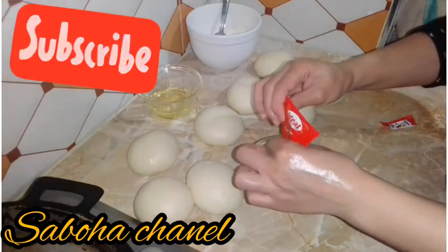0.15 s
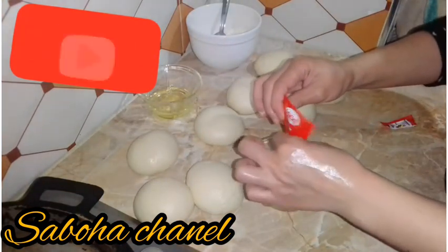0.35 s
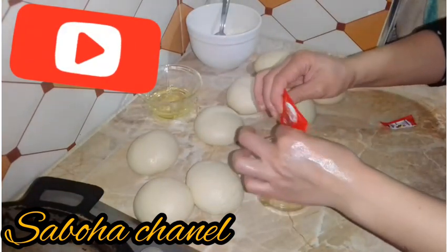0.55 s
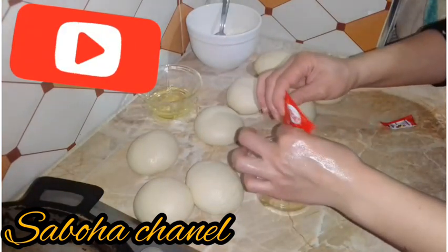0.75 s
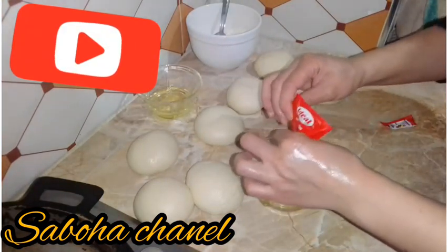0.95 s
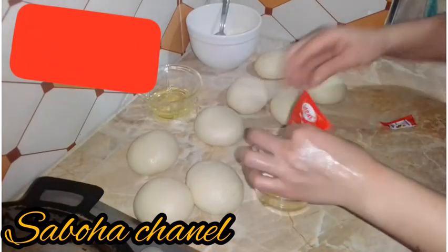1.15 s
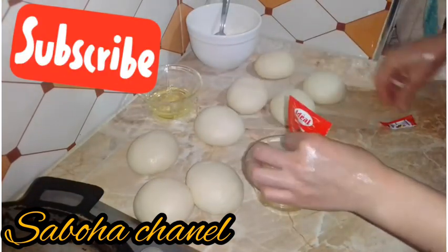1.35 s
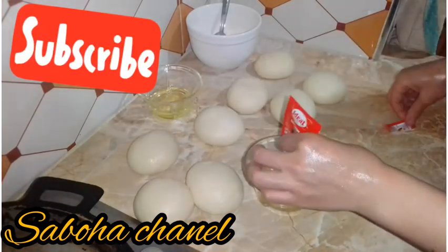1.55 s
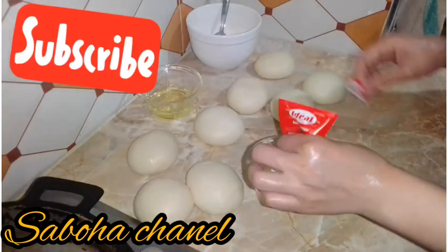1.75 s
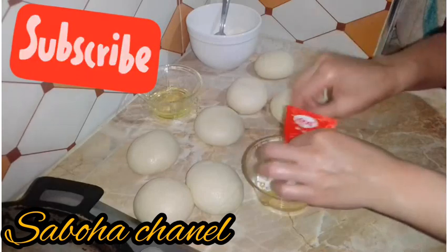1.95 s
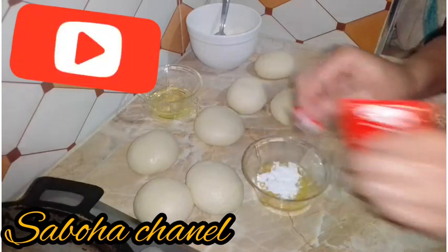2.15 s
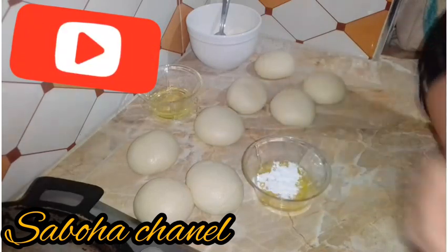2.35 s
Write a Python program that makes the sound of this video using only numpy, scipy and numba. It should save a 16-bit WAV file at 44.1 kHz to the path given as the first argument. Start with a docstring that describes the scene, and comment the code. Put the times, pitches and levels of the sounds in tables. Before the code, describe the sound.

A small stiff paper sachet crinkles and tears close by in a quiet tiled kitchen.

```python
"""Paper sachet torn in a kitchen

A small paper sachet is torn, squeezed and shaken close to a phone in a tiled kitchen.
Dense fibre clicks ring the stiff sheet in short strokes and single creases snap at their own pitch.
A faint low tone sinks as the tear begins, and filtered bursts make the rumble of hands on the worktop.
Decaying noise gives the small room its short tail; coloured noise is the quiet hum behind."""
import sys
import numpy as np
from scipy import signal
from scipy.fft import rfft, irfft
from scipy.io import wavfile
from scipy.ndimage import uniform_filter1d
from numba import njit

SR = 44100
rng = np.random.default_rng(int(sys.argv[2]) if len(sys.argv) > 2 else 0)


def wrap_up_sound(samples):
    """Save the sound to the file named by the first command line argument, as 16-bit audio."""
    columns = np.atleast_2d(samples).T
    # keep every value between -1 and 1, then stretch to whole-number steps
    tamed = np.clip(columns, -1, 1)
    steps = np.round(tamed * 32767).astype(np.int16)
    wavfile.write(sys.argv[1], SR, steps)


def field_ratio(decibels):
    """Amplitude ratio for a level in dB (20 dB per decade); scalars and array-likes work."""
    return 10 ** (np.asarray(decibels, dtype=float) / 20)


N = 105840

# Broad colour of paper clicks. Each row: frequency in Hz, relative level in dB per Hz.
PAPER = [(600, -8), (800, -5), (1100, -5.5), (1450, -10.5), (2000, -9.5), (2800, -7), (4000, -3.5),
         (5100, -11.5), (5900, -23.5), (8000, -24), (10000, -23), (12000, -15.5), (14200, -7.5),
         (16000, -10)]


def unit(x):
    """Scales a sound to an rms of 1."""
    return x / np.sqrt(np.mean(x ** 2))


def colour(x, points):
    """Causal minimum-phase filter through (Hz, dB) points, built from the folded cepstrum."""
    points = np.array(points, float)
    freqs = np.fft.rfftfreq(4096, 1 / SR)
    level_db = np.interp(np.log(freqs + 1), np.log(points[:, 0]), points[:, 1])
    cepstrum = irfft(level_db * np.log(10) / 20)
    cepstrum[1:2048] *= 2
    cepstrum[2049:] = 0
    response = irfft(np.exp(rfft(cepstrum)))[:2048]
    return signal.fftconvolve(x, response)[:N]


def band(x, lo_hz, hi_hz):
    """Keeps the range between two frequencies."""
    edges = [lo_hz, min(hi_hz, 0.45 * SR)]
    return signal.sosfilt(signal.butter(4, edges, "band", fs=SR, output="sos"), x)


def ring(x, hz, width_hz):
    """One fixed resonance, gain 1 at its centre."""
    return signal.lfilter(*signal.iirpeak(hz, hz / width_hz, SR), x)


@njit
def moving_ring(x, hz, width_hz):
    """One resonance whose centre moves, as a state-variable filter; gain 1 at the centre."""
    y, band_state, low_state = np.empty(len(x)), 0., 0.
    for i in range(len(x)):
        g = np.tan(np.pi * hz[i] / SR)
        k = width_hz / hz[i]
        v = (band_state + g * (x[i] - low_state)) / (1 + g * (g + k))
        band_state = 2 * v - band_state
        low_state = low_state + 2 * g * v
        y[i] = k * v
    return y


def walk(rate):
    """Random levels held for 1 / rate seconds and slewed twice."""
    hold = int(SR / rate)
    levels = np.repeat(rng.standard_normal(N // hold + 1), hold)
    slewed = uniform_filter1d(uniform_filter1d(levels, hold), hold)
    return 2.04 * slewed[:N]


def curve(rows, index):
    """One column of a table, drawn over time; the first column is seconds."""
    rows = np.array(rows, float)
    return np.interp(np.arange(N) / SR, rows[:, 0], rows[:, index])


def effort():
    """Gains of the finger strokes, summed in power: sheet, lower body and fine treble."""
    # Strokes on the paper. Each row: start in seconds, swell in seconds, time to fall 20 dB in seconds
    # (never under 0.015), level in dB, lower body in dB and fine treble in dB relative to that level.
    strokes = [(0, 0.0015, -0.27, -59, -4, -3), (0.178, 0.026, 0.06, -52, -6, -4),
               (0.221, 0.026, 0.06, -45.5, -8.5, -7), (0.299, 0.0041, -0.04, -40.5, -25, -10),
               (0.365, 0.0047, 0.09, -47, -16, -2), (0.422, 0.003, 0.54, -53.5, -40, -9),
               (0.463, 0.044, -0.01, -38, -12, -12), (0.51, 0.033, 0.03, -44.5, -1, -7.5),
               (0.618, 0.031, 0.07, -36, -11, -12), (0.725, 0.034, 0.1256, -35.5, -8, -12.5),
               (0.86, 0.036, 0.0547, -34, -11, -12), (0.955, 0.026, 0.0431, -42, -7.5, -17),
               (0.993, 0.03, 0.0682, -37.5, -7, -12.5), (1.146, 0.037, 0.0558, -43.5, -10.5, -5.5),
               (1.252, 0.03, 0.15, -48.5, -8, -6), (1.331, 0.034, -0.04, -52, -0.5, -9),
               (1.43, 0.031, 0.05, -55, -6, -2), (1.554, 0.0029, 0.0044, -65.5, -6, -25),
               (1.593, 0.0012, 0.16, -69.5, -30, -4), (1.721, 0.06, 0.06, -50, -9, -3),
               (1.796, 0.0041, 0.08, -46, -6, -1), (1.921, 0.019, 0.0626, -48.5, -7.5, -2),
               (1.951, 0.009, 0.0727, -48.5, -34, -5), (2.041, 0.037, 0.03, -53, -8.5, -1),
               (2.088, 0.026, 0.0633, -50, -5.5, -4.5), (2.225, 0.04, 0.02, -61.5, -7, -2)]
    start_db, grip_s, fall_curve = -11, 0.0031, 1.2  # grips under its top, swells, falls ever faster
    power = np.full((3, N), 1e-18)
    for start_s, swell_s, fall_s, db, low_db, fine_db in strokes:
        i = int(start_s * SR)
        fall_s = max(fall_s, 0.015)
        t = np.arange(min(N - i, int((swell_s + 4 * fall_s) * SR))) / SR
        rise_db = start_db * (1 - t / swell_s).clip(0, 1)
        drop_db = 20 * ((t - swell_s) / fall_s).clip(0) ** fall_curve
        gain = field_ratio(db + rise_db - drop_db) * (t / grip_s).clip(0, 1)
        power[:, i:i + len(t)] += np.outer(field_ratio([0, low_db, fine_db]), gain) ** 2
    return np.sqrt(power)


def fibres(clicks_per_s, scatter_db, click_s):
    """Short bursts of breaking fibres, scattered in size, over a rubbing hiss."""
    rub_db = -2.5
    breaks = rng.random(N) < clicks_per_s / SR
    sizes = field_ratio(scatter_db * rng.exponential(1, N).clip(0, 3))
    burst_noise, rub_noise = rng.standard_normal((2, N))
    envelope = signal.lfilter([1], [1, -np.exp(-1 / (click_s * SR))], breaks * sizes)
    return unit(unit(envelope * burst_noise) + field_ratio(rub_db) * rub_noise)


def crinkle(body, low, fine):
    """Bursts of many colours ring the sheet; its modes shift, come and go as the paper bends."""
    # Modes of the sheet. Each row: centre in Hz, width in Hz, relative level in dB while it is torn,
    # relative level in dB once it hangs open.
    modes = [(1018, 74, -4, -44), (1232, 39, -11.5, -9.5), (1613, 147, -13.5, -4), (1775, 36, -11.5, -18),
             (2087, 50, -8, -11.5), (2463, 25, -8.5, -6.5), (2820, 69, 1.5, -1.5), (3126, 61, -18, 2.5),
             (3480, 69, -0.5, -3.5), (3712, 98, 1, -8), (4047, 80, -2, -2), (4522, 74, -2, 2.5),
             (4910, 160, 0.5, -2), (5100, 105, -2.5, -5), (5520, 274, -9.5, 0)]
    # Edges in Hz of the ranges in which fibres snap.
    patch_hz = (650, 1300, 2300, 3300, 4400, 7000, 10500, 16500)
    # The sheet's upper range as the tear moves on. Each row: time in seconds, relative level in dB.
    upper = [(0, -5.5), (.22, -2), (.56, -6.5), (.66, 0), (.9, -3.5), (1.2, -1.5), (1.6, -4.5), (1.8, -1),
             (2.4, -2.5)]
    opens_s = (1.1, 1.95)  # the sheet changes shape between these times
    modes_db, mode_walk_db, mode_walk_per_s = 8, 2, 22
    bend, bend_per_s = 0.0065, 15  # scale of the shift of each mode, as a share of its pitch

    def burst():
        return fibres(clicks_per_s=900, scatter_db=4, click_s=0.00048)

    wide = burst()  # spans all ranges, beside a separate burst in each
    patches = [band(wide + burst(), lo, hi) for lo, hi in zip(patch_hz, patch_hz[1:])]

    opened = np.interp(np.arange(N) / SR, opens_s, (0, 1))
    moving_modes = []
    for hz, width_hz, torn_db, open_db in modes:
        level_db = modes_db + torn_db + (open_db - torn_db) * opened
        gain = field_ratio(level_db + mode_walk_db * walk(mode_walk_per_s))
        centre_hz = hz * (1 + bend * walk(bend_per_s))
        moving_modes.append((centre_hz, float(width_hz), gain))

    def sheet(push):
        ringing = sum(moving_ring(push * gain, hz, width) for hz, width, gain in moving_modes)
        return colour(push, PAPER) + band(ringing, 820, 7150)

    # level of each part under a steady push, so that the strokes set the final level
    steady = sheet(sum(patches))
    low = low / np.std(band(steady, patch_hz[0], patch_hz[2]))
    body = body / np.std(band(steady, patch_hz[2], patch_hz[5]))
    fine = fine / np.std(band(steady, patch_hz[5], patch_hz[7]))
    gains = (low, low, body, body, body * field_ratio(curve(upper, index=1)), fine, fine)
    return sheet(sum(patch * gain for patch, gain in zip(patches, gains)))


def snaps():
    """A crease buckles: a tick, a short ring at its own pitch and a rustle of settling paper."""
    # Crease snaps. Each row: time in seconds, level in dB before the common trim, ring in Hz.
    creases = [(0.191, -38.5, 3580), (0.2359, -36, 3510), (0.3011, -26, 2820), (0.3671, -33.5, 2820),
               (0.4293, -32, 4120), (0.4639, -34.5, 3540), (0.4789, -26, 3490), (0.625, -34.5, 2820),
               (0.7313, -33.5, 4950), (0.844, -51, 4360), (0.8709, -24, 2092), (0.8895, -28, 4700),
               (0.9561, -28.5, 3630), (1.0184, -32.5, 4600), (1.1593, -38, 3540), (1.2736, -40, 2830),
               (1.3008, -30, 3880), (1.3656, -35, 4490), (1.4306, -44, 1610), (1.4573, -38.5, 2080),
               (1.5972, -43, 3480), (1.732, -46, 4380), (1.8022, -31.5, 4700), (1.934, -41, 2460),
               (2.055, -39.5, 4600), (2.112, -31.5, 3030)]
    trim_db, ring_s = -8.5, 0.0044
    tick_db, tick_s, tail_db, tail_s = -31, 0.00023, -11.5, 0.031
    rustles, rings = np.zeros(N), np.zeros(N)
    t = np.arange(3000) / SR
    rustle_shape = field_ratio(tick_db) * np.exp(-t / tick_s) + field_ratio(tail_db) * np.exp(-t / tail_s)
    for start_s, db, hz in creases:
        i = int(start_s * SR)
        gain = field_ratio(db + trim_db)
        ring_noise, rustle_noise = rng.standard_normal((2, len(t)))
        tone = np.sin(2 * np.pi * hz * t) + 0.87 * band(ring_noise, hz * 0.63, hz * 1.87)
        rings[i:i + len(t)] += gain * (tone * np.exp(-t / ring_s))[:N - i]
        rustles[i:i + len(t)] += gain * (rustle_noise * rustle_shape)[:N - i]
    paper_rms = np.std(colour(rng.standard_normal(N), PAPER))
    return rings + colour(rustles, PAPER) / paper_rms


def slide():
    """A faint, wavering low tone sinks as the tear begins: a sine with a gliding pitch."""
    # Low rubbing tone. Each row: time in seconds, pitch in Hz before wavering, rms level in dB likewise.
    glide = [(.18, 352, -60), (.255, 350, -57), (.39, 249.7, -59.5), (.5, 232.4, -68)]
    t = np.arange(N) / SR
    pitch_hz = curve(glide, index=1) * (1 + 0.016 * walk(24.6))
    tone = np.sqrt(2) * np.sin(2 * np.pi * np.cumsum(pitch_hz) / SR)
    sounding = (t > glide[0][0]) & (t < glide[-1][0])
    return tone * field_ratio(curve(glide, index=2) + 1.7 * walk(19.3)) * sounding


def hands(low):
    """Fingers and packet rumble through the worktop, all along and, lagging, with each stroke."""
    # Rumble of hands and packet. Each row: time in seconds, level in dB before wavering.
    rumble = [(0.0, -62.5), (0.14, -78.5), (0.2, -59), (0.57, -59), (1.05, -73), (1.12, -61), (1.38, -63),
              (1.53, -74.5), (1.7, -72), (2.1, -62.5), (2.4, -74)]
    # Colour of the worktop. Each row: frequency in Hz, relative level in dB per Hz.
    worktop = [(71, -80), (120, -33), (162, -60), (238, -5), (345, -1.5), (542, -1), (689, -9), (1000, -21),
               (1300, -17.5), (2200, -120)]
    # Resonances of the worktop. Each row: centre in Hz, width in Hz, relative level in dB.
    top_modes = [(366, 70, 3.5), (538, 45, -3)]
    bump_db, bump_s = -3.5, 0.01  # share of a stroke that reaches the worktop, and its lag
    follow = 1 / (bump_s * SR)
    bumps = signal.lfilter([follow], [1, follow - 1], low) * field_ratio(bump_db)
    gain = np.hypot(field_ratio(curve(rumble, index=1)), bumps) * field_ratio(1.7 * walk(29.35))
    knocks = colour(fibres(clicks_per_s=900, scatter_db=0.23, click_s=0.0023), worktop)
    resonances = sum(field_ratio(db) * ring(knocks, hz, width) for hz, width, db in top_modes)
    return unit(knocks + resonances) * gain


def room_tail(near):
    """The small room's short tail: noise decaying exponentially, convolved with the near sound."""
    tail_db, t60_s = -10, 0.069
    t = np.arange(SR // 2) / SR
    tail = rng.standard_normal(len(t)) * np.exp(-np.log(1000) * t / t60_s) * (t > 0.003)
    tail = tail / np.sqrt(np.sum(tail ** 2))
    return field_ratio(tail_db) * signal.fftconvolve(near, tail)[:N]


def hum():
    """Nearly steady room and street noise, as coloured noise."""
    # Colour of the hum. Each row: frequency in Hz, relative level in dB per Hz.
    room_colour = [(21, -26), (36, 0), (58, -19), (113, -9), (158, -28), (226, -5.5), (284, -1), (497, -25),
                   (594, -21.5), (1560, -22.5), (11700, -22.5), (14700, -8.5), (15900, -17.5)]
    return unit(colour(rng.standard_normal(N), room_colour)) * field_ratio(-68.5 + 0.43 * walk(9.5))


def port_difference(mid):
    """Unlikeness of the two microphone ports: treble noise that follows the level of the sound."""
    level_db, range_hz = -8, (7680, 12200)
    treble_power = uniform_filter1d(band(mid, *range_hz) ** 2, size=400)
    noise = unit(band(rng.standard_normal(N), *range_hz))
    return field_ratio(level_db) * np.sqrt(treble_power.clip(0)) * noise


def scene():
    """Paper and hands close to the phone, with the room around them, in two channels."""
    body, low, fine = effort()
    close = crinkle(body, low, fine) + snaps() + slide() + hands(low)
    near = band(close, 215, SR)  # the phone's bass cut for near sounds, in Hz
    mid = near + room_tail(near) + hum()
    side = port_difference(mid)
    return np.array([mid + side, mid - side])


def band_limit(x):
    """A steep low-pass at the top of the band."""
    return signal.sosfilt(signal.butter(12, 16060, fs=SR, output="sos"), x)


def record(dry):
    """The phone cuts the top steeply and its converter adds a tiny offset."""
    top_hz, offset = 15830, -0.0002
    top_cut = signal.ellip(10, 0.2, 60, top_hz, fs=SR, output="sos")
    mix = signal.sosfilt(top_cut, dry) + offset
    return band_limit(mix)


dry = scene()
out = record(dry)
wrap_up_sound(out)
```